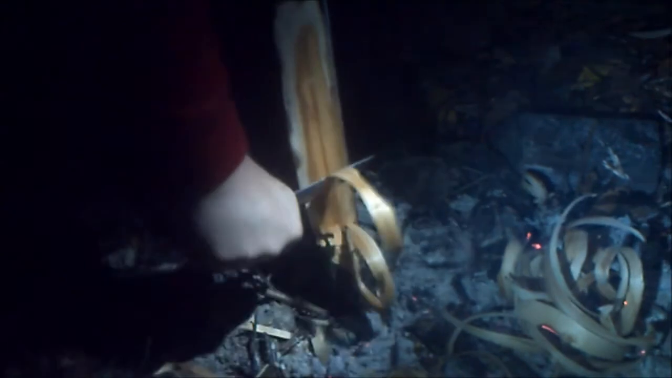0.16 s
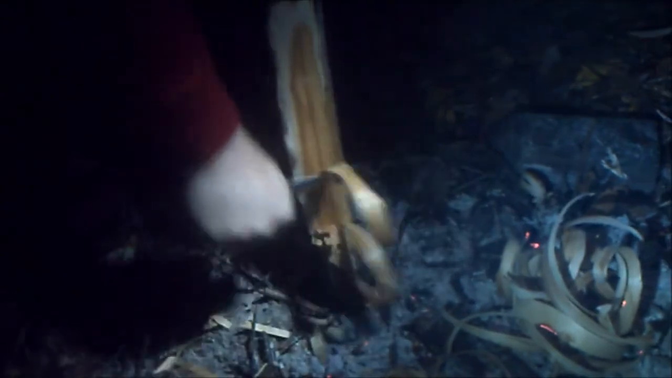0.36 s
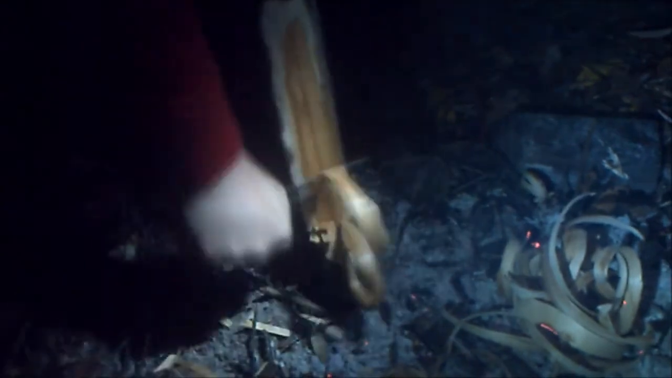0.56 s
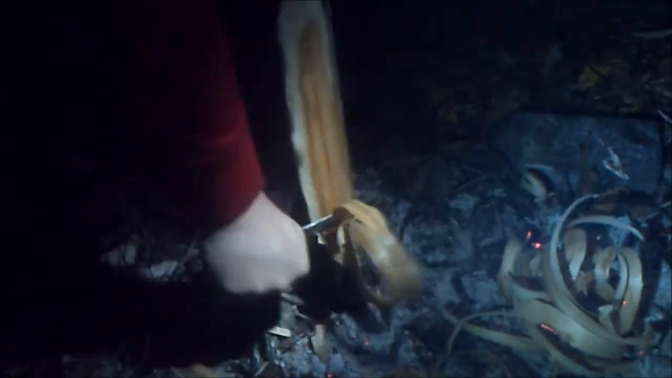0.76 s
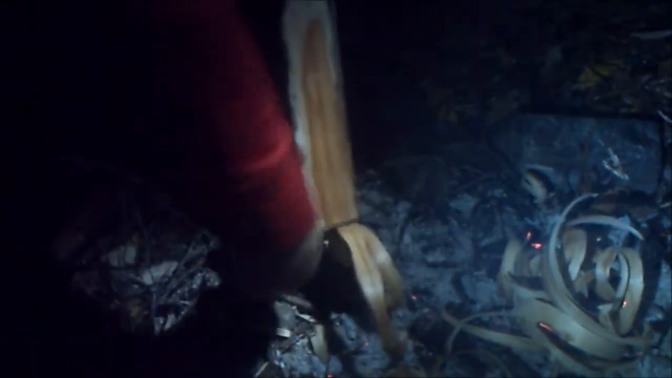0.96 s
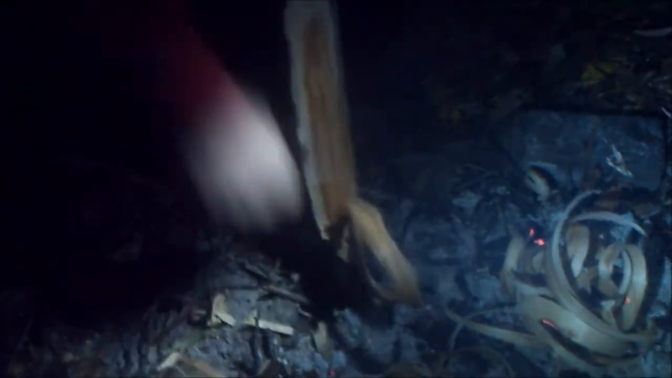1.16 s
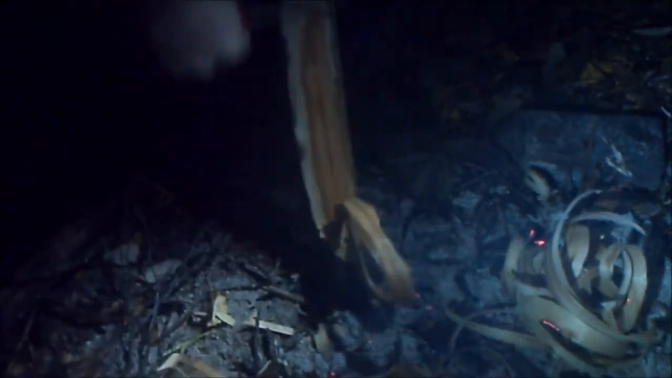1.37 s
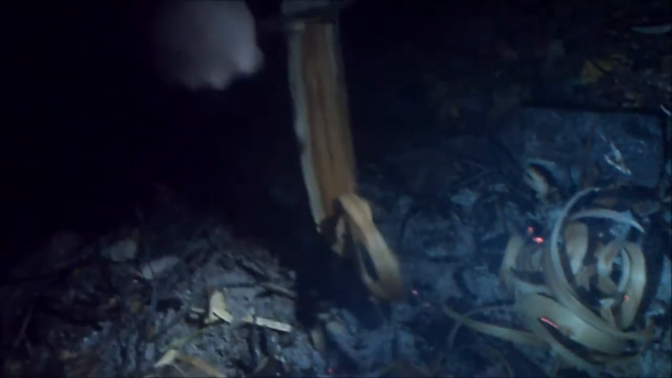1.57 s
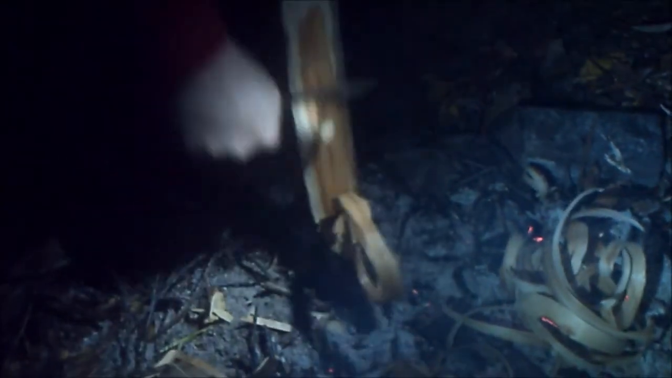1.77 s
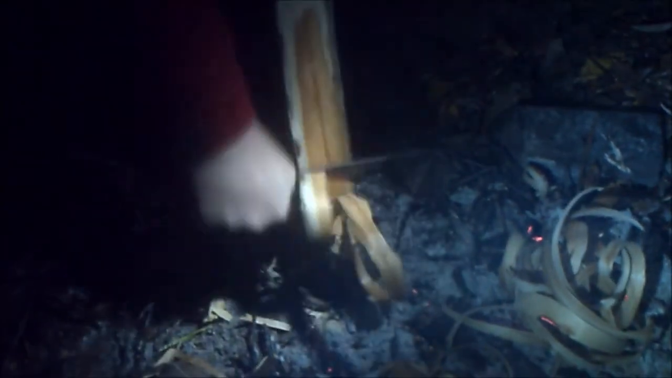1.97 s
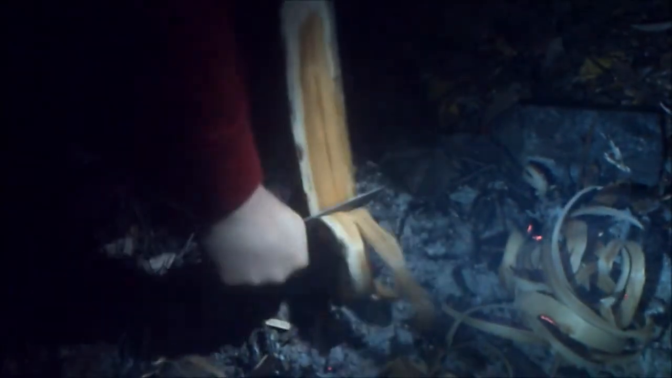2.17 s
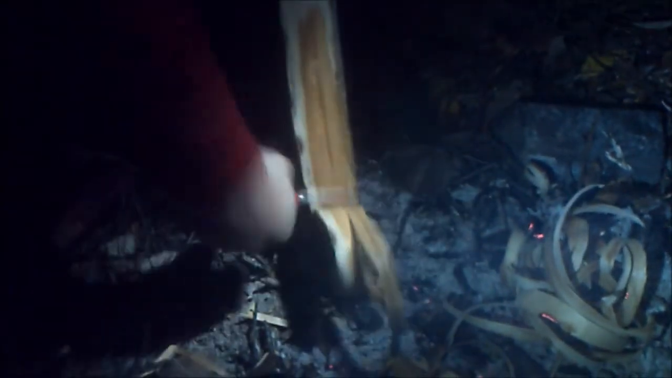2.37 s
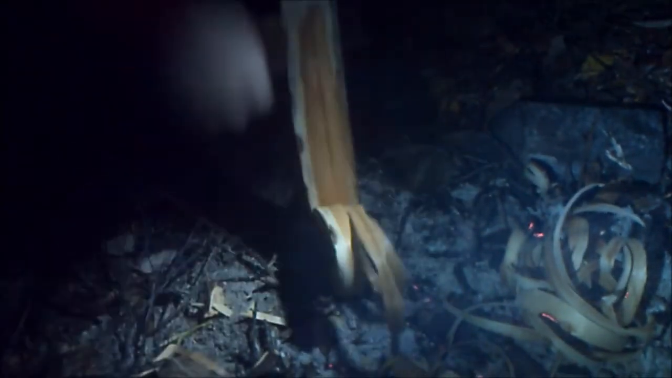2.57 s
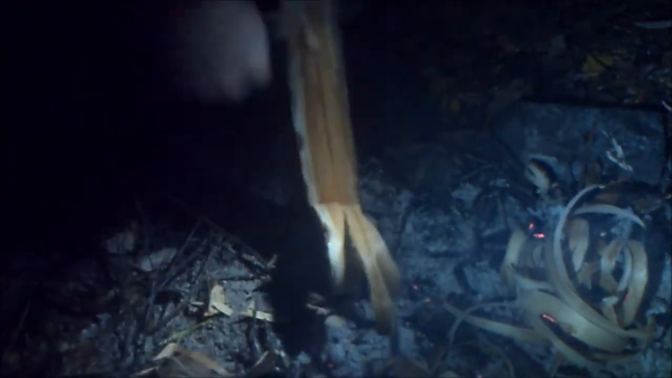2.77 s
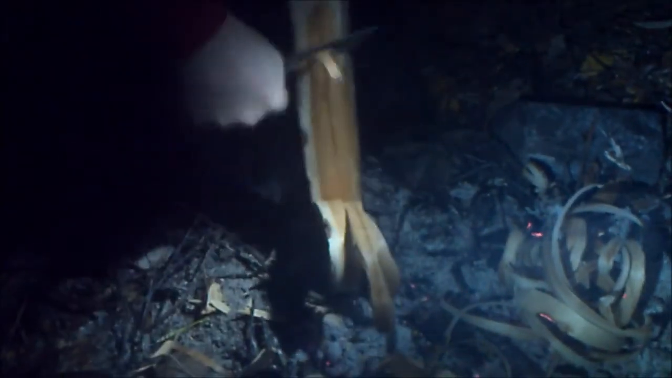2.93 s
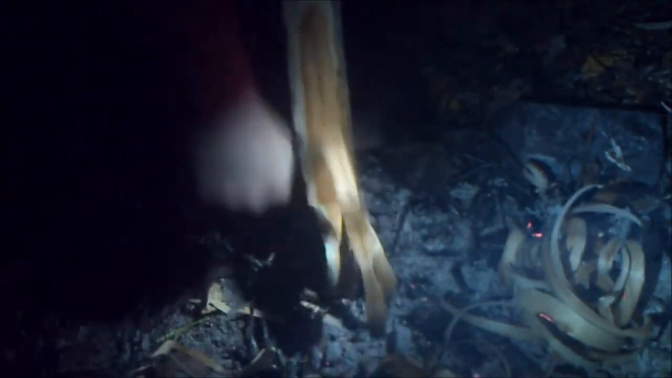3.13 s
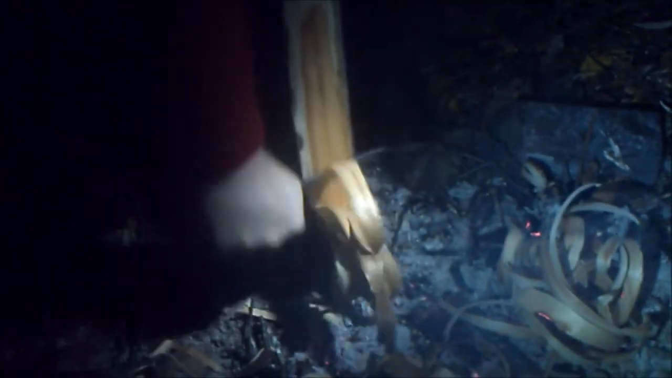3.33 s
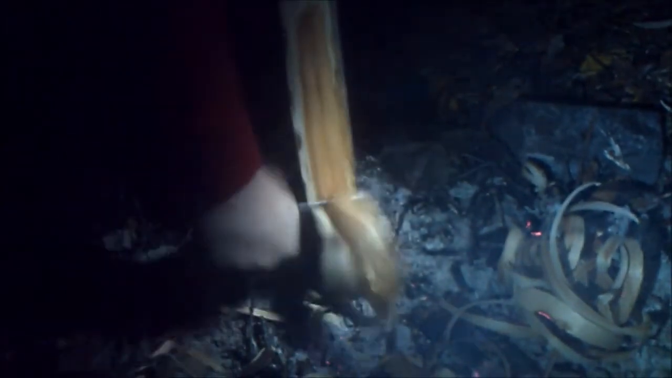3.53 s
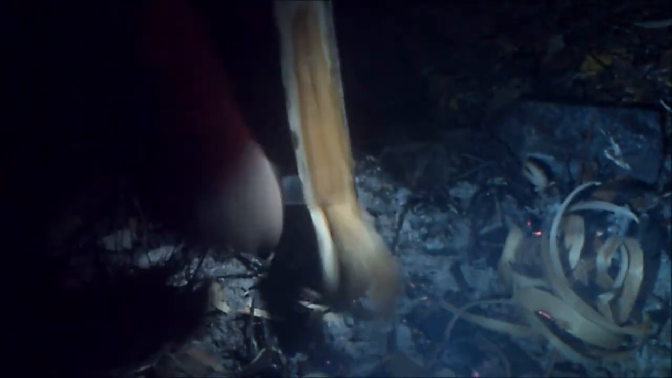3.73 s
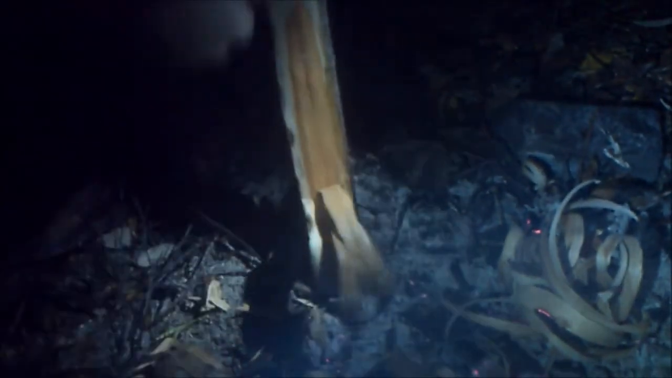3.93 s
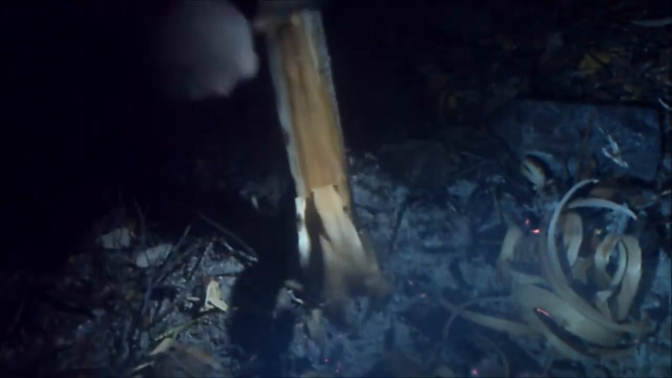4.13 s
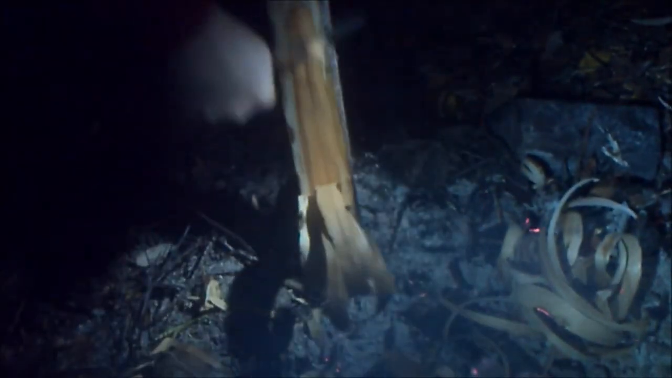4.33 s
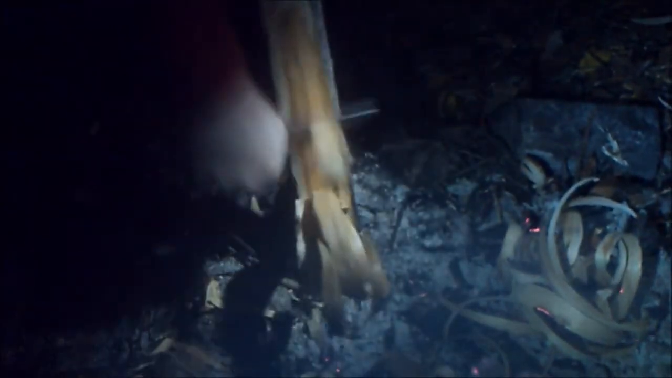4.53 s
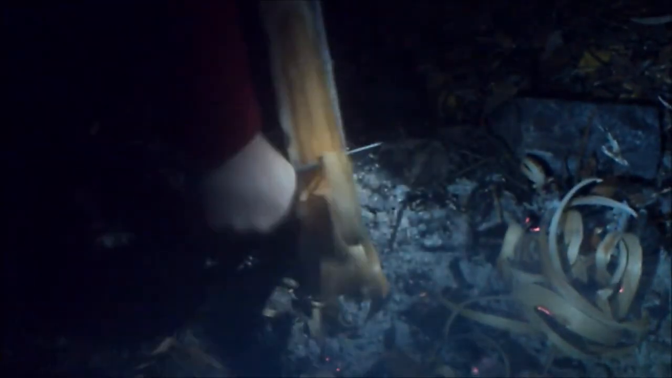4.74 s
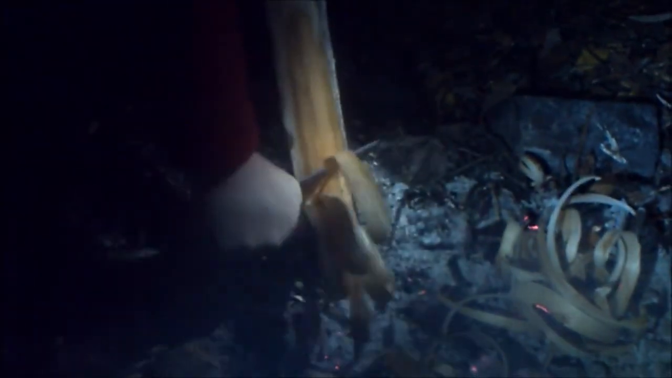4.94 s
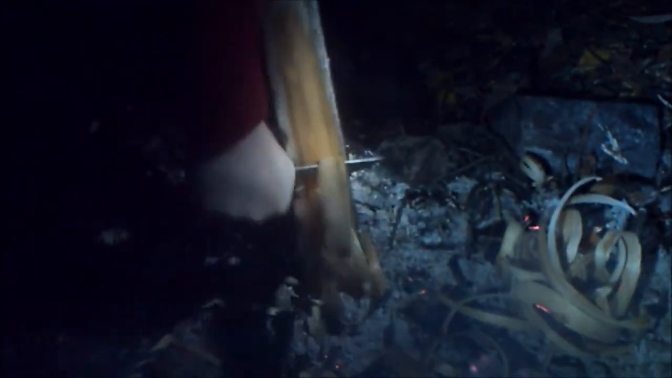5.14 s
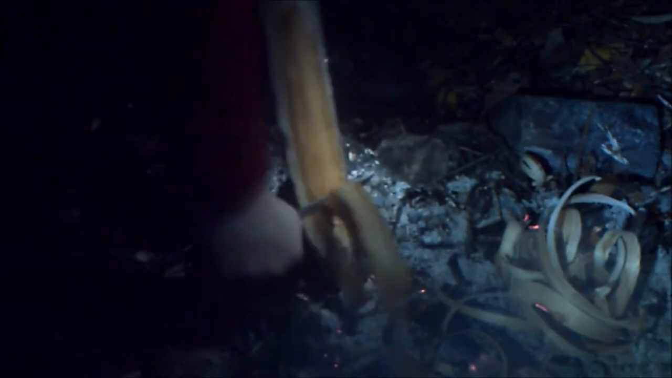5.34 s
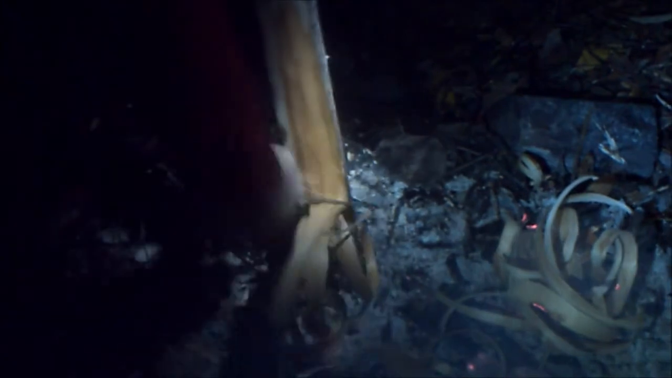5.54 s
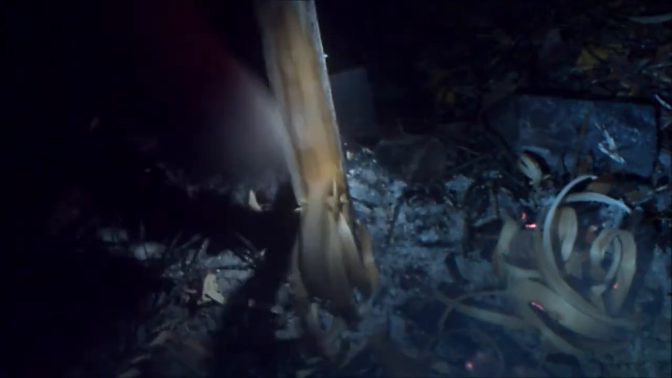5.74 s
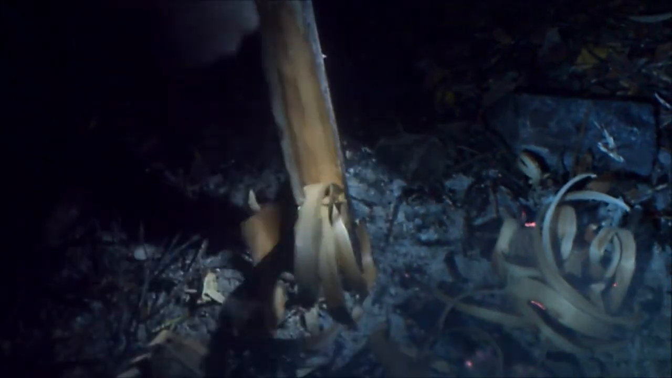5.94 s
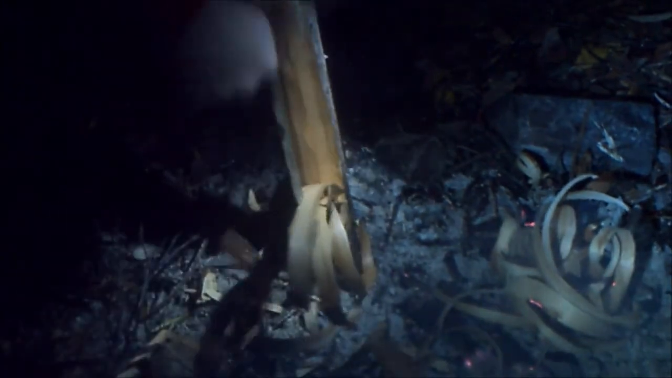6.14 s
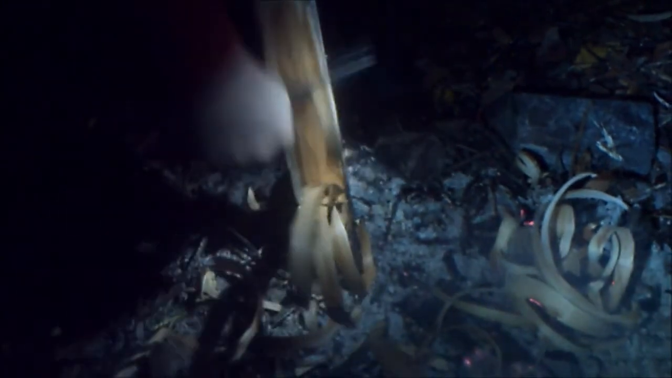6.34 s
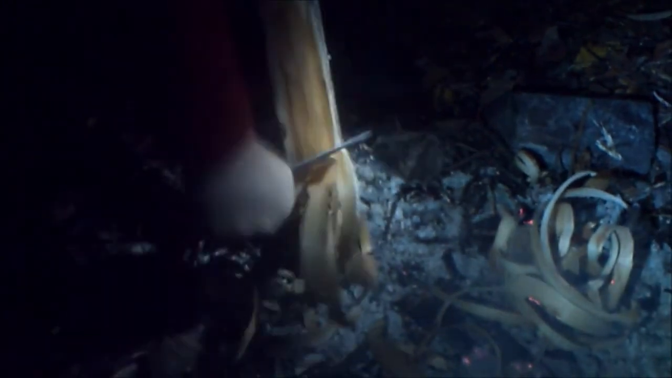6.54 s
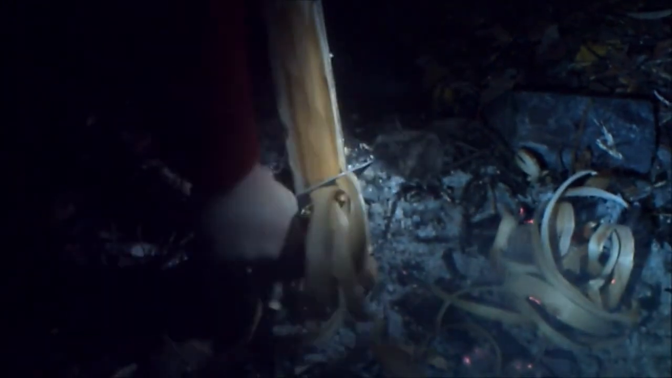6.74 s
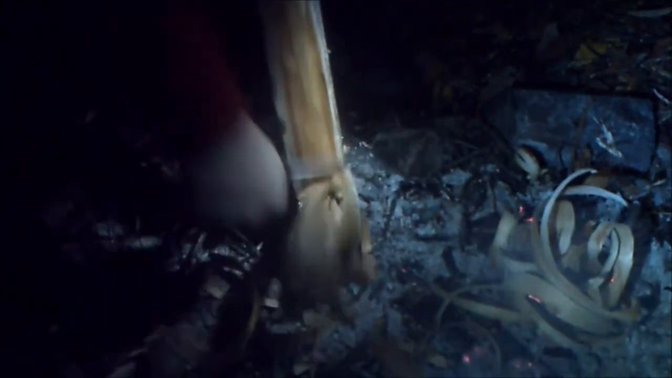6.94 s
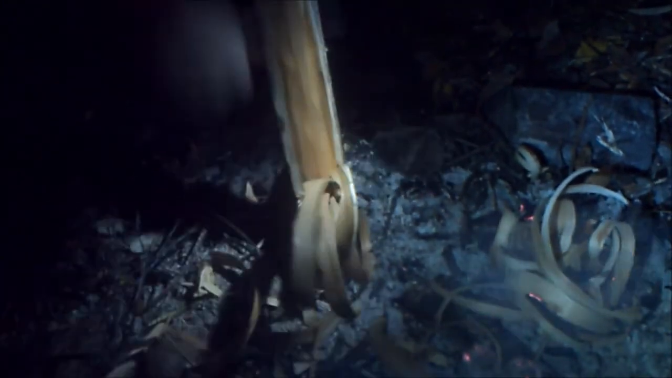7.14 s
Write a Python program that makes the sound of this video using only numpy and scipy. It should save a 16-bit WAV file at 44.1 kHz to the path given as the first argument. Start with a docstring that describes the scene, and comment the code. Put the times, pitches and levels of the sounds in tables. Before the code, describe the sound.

A knife rasps down a dry wooden stick in short ragged strokes, fibres tearing and snapping, with small ticks and hollow knocks between, over soft night air.

```python
"""Whittling a dry stick

A knife shaves long curls down a dry stick that stands on the ground, close to a microphone on a still night.
The edge rasps as a stream of snapping fibres, and catches and tears free in ragged bursts of filtered noise;
each lurch rings the damped modes of the stick. Between strokes the curls brush and tick, lone fibres snap and
the wood gives hollow knocks, as damped sines, and a faint sinking creak. Soft air noise and a thin whine run on.
"""
import sys
import numpy as np
from scipy import signal
from scipy.fft import rfft, irfft
from scipy.io import wavfile
from scipy.ndimage import uniform_filter1d, map_coordinates

SR = 44100
rng = np.random.default_rng(int(sys.argv[2]) if len(sys.argv) > 2 else 0)


def wav_record(signal):
    """Record a signal, one row per channel, as 16-bit PCM in the file named by sys.argv[1]."""
    frames = np.transpose(np.atleast_2d(signal))
    bounded = np.clip(frames, -1, 1)
    # unit amplitude maps onto the largest positive 16-bit level
    quanta = np.round(bounded * 32767).astype(np.int16)
    wavfile.write(sys.argv[1], SR, quanta)


N = 321919
TIME = np.arange(N) / SR
HZ = np.fft.rfftfreq(N, 1 / SR)

# Levels, woodiness and brightness in the tables are relative: the functions trim and scale them.
# spectrum of the background air: [freq_hz, density_db]
AIR_SPECTRUM = [(12, -15), (20, -0.5), (65, 1.5), (93, -2), (129, -2.5), (174, -2.5), (309, -4),
                (478, -7.5), (519, -5.5), (1030, -12), (2220, -16), (7390, -22.5), (8700, -21.5),
                (13900, -24)]
# whine of the microphone's electronics: [freq_hz, width_hz, level_db]
WHINE_BANDS = [(8680, 140, -60), (11200, 100, -68)]
# blade and curls brushing lightly over the wood, and early on a sleeve rustling faintly: [middle_s, length_s,
# level_db, bright_db]
BRUSH_STROKES = [(0.213, 0.053, -51, -22), (0.497, 0.08, -52.5, -16), (0.903, 0.043, -42, 13),
                 (1.06, 0.018, -42.5, 17), (1.202, 0.035, -47.5, -9), (1.583, 0.11, -43, -12),
                 (1.96, 0.064, -38, 13), (2.262, 0.03, -38.5, 9), (2.764, 0.12, -45.5, -7),
                 (3.18, 0.047, -35, 9), (3.33, 0.12, -37, 9), (3.586, 0.074, -35, 6),
                 (3.694, 0.045, -38, 12), (4.09, 0.077, -47, -13), (4.749, 0.032, -33, -4),
                 (5.013, 0.046, -41.5, -6), (5.186, 0.05, -43.5, -7), (5.315, 0.12, -44.5, -5),
                 (5.478, 0.039, -33, 7), (5.632, 0.02, -40.5, 5), (6.058, 0.1, -38, -3),
                 (6.226, 0.05, -38, -2)]
# pushes of the blade through the wood; drag is the rumble of the stick relative to the rasp:
# [start_s, length_s, rasp_db, swell_db, drag_db, bright_db, catch_db (relative to rasp), catches_per_s]
BLADE_PUSHES = [(0.55, 0.076, -38, 0, -5, -1, 8, 49), (1.571, 0.18, -34, 2, 0.5, 12, -4, 81),
                (1.767, 0.1, -27.5, 0.5, -6.5, 7, 8, 87), (1.8824, 0.037, -29, 1, -11.5, -2.5, 10.5, 75),
                (1.974, 0.07, -30, 7, -11, -4, 9, 87), (2.853, 0.04, -35.5, -0.5, -2.5, 1, 2, 99),
                (2.972, 0.14, -30, -5.5, -9.5, 12.5, 1, 71), (3.095, 0.08, -26, -6.5, -13, 7, 4.5, 142),
                (3.335, 0.032, -32, -4, -7, -6, 7, 80), (4.222, 0.033, -35.5, 9, -10, 9, 4, 54),
                (4.2955, 0.11, -38, -8, -3, 2, 8, 56), (4.374, 0.042, -32, -4, -10.5, 5, 11, 88),
                (4.44, 0.064, -32.5, -3.5, -9, -1.5, 16, 110), (4.584, 0.044, -26, 1.5, -7, 1.5, 7, 60),
                (6.134, 0.068, -37, -2, -5, -2, 17.5, 62), (6.255, 0.053, -27.5, 1.5, -5, -0.5, 9, 52),
                (6.388, 0.062, -36, -0.5, -3, -4, 17, 61), (6.513, 0.02, -42.5, 4, -4, 0, 21, 67),
                (6.573, 0.053, -43.5, 0, -8, 3, 6, 63)]
# spectrum of the rasp: [freq_hz, density_db]
RASP_SPECTRUM = [(240, -45), (400, -46), (554, -11.5), (735, -3), (891, -31), (1220, -10), (1520, -4.5),
                 (2110, -1.5), (2550, 2.5), (3390, 4), (3930, -5), (6700, -1), (8250, -1), (10800, -3.5),
                 (13900, -10.5)]
# fixed peaks and hollows in the colour of the scraping and tearing, from blade and microphone:
# [freq_hz, width_hz, lift_db]
CUT_COLOUR = [(1230, 58, -15), (1700, 190, 2), (2500, 610, -5), (4280, 140, 4.5), (5500, 230, 2),
              (6630, 90, 4.5), (8230, 230, 9), (8250, 440, -10), (9320, 500, 2.5), (10720, 250, 5),
              (13000, 330, -11), (14600, 350, -27)]
# the flat of the blade, singing faintly while it slides: [freq_hz, width_hz, lift_db]
SLIDE_RESONANCES = [(2100, 87, 5.5), (3544, 140, 2.5)]
# damped modes of the held stick: [freq_hz, level_db, t60_s]
STICK_MODES = [(189.6, 5.5, 0.034), (220, 7.5, 0.023), (302, -14.5, 0.053), (540, -8, 0.0088)]
# curls ticking against each other: [start_s, level_db, pitch_hz]
CURL_TICKS = [(.225, -36, 2230), (.4115, -33, 2900), (.723, -34, 2080), (.7375, -28, 2220),
              (.765, -37, 2100), (.7915, -30, 2140), (2.243, -29, 2080), (2.2555, -21, 1920),
              (4.732, -37, 2110), (5.09, -32.5, 2480), (6.358, -31.5, 2190), (6.795, -30, 2090),
              (7.084, -36.5, 2530)]
# modes of a tick: [multiple_of_pitch, level_db, swell_s]
CURL_TICK_MODES = [(1, 0.1, 0.00065), (1.4, -1.5, 0.00076)]
# bundles of fibres tearing free as the blade lurches:
# [middle_s, level_db, length_s, woody_db, bright_db, thump_db]
FIBRE_TEARS = [(0.557, -3.5, 0.0035, -7, -2.5, -26.5), (0.565, -11.5, 0.0013, -2, 4, -32.5),
               (0.593, -13.5, 0.0051, 5.5, -12, -43), (0.6, -13.5, 0.0056, 0, -5, -42),
               (0.6045, -21, 0.006, 20, -5, -22), (1.792, -20, 0.013, -18, 0, -31),
               (1.9788, -6.5, 0.0036, 10, 14, -26.5), (1.9861, -16.5, 0.0055, 2, -16, -29),
               (2.0305, -8.5, 0.0052, 9, 5.5, -26), (2.0407, -13, 0.0053, 1, -6, -28),
               (2.8768, -17, 0.0026, 0, 4.5, -35.5), (2.982, -16.5, 0.012, -16, 11, -33),
               (3.0077, -15.5, 0.0046, 11, 13, -26.5), (3.146, -8.5, 0.0016, 1, 10, -51),
               (3.3455, -8, 0.007, -12, -12, -32.5), (3.353, -8.5, 0.0044, 6.5, -2.5, -22.5),
               (4.4134, -8, 0.0014, -2, 0, -32), (4.639, -11, 0.00272, -7, -13.5, -24.5),
               (5.2216, -9, 0.0027, 7, 7, -51), (5.227, -7, 0.0031, 3, -11, -31),
               (5.2322, -1.5, 0.0045, 14, -1, -27.5), (6.396, -14, 0.01, 19.5, 5.5, -32),
               (6.438, -25, 0.008, 22, -14, -21.5), (6.518, -18.5, 0.0092, 22, 8.5, -22.5),
               (6.5855, -10, 0.0093, 22, 12.5, -19), (6.6162, -19, 0.0033, 10, 8, -53),
               (6.6245, -10, 0.0021, 12.5, 5.5, -25.5)]
# spectrum of a tear: [freq_hz, density_db]
TEAR_SPECTRUM = [(80, -66), (220, -12.5), (450, -21), (700, -13), (1200, -21), (1700, -11.5), (2500, -8.5),
                 (3300, -5.5), (4200, -7.5), (6200, 1.5), (8000, 1.5), (10300, 0.5), (12500, -6),
                 (14000, -8)]
# single dry fibres snapping in the curls: [middle_s, level_db]
FIBRE_SNAPS = [(0.872, -20.5), (2.155, -30.5), (2.895, -18.5), (3.296, -23), (3.404, -25), (3.5856, -7),
               (3.726, -20), (4.8226, -17.5), (5.02, -25), (5.3868, -17), (5.6094, -28.5), (6.1071, -17)]
# hollow knocks of wood: [start_s, level_db, pitch_hz]
WOOD_KNOCKS = [(1.178, -33, 597), (2.5305, -26.5, 653), (2.610, -38, 920), (3.353, -25, 720),
               (3.8455, -27, 736), (5.231, -20, 556), (5.6825, -34.5, 815), (5.696, -34, 846),
               (6.794, -41, 1030), (7.076, -32.5, 650)]
# modes of a knock: [multiple_of_pitch, level_db, swell_s]
WOOD_KNOCK_MODES = [(1, 4.5, 0.0017), (2.4, -6.5, 0.00072), (2.85, -5.5, 0.00046), (4.2, -7.5, 0.0013),
                    (5.5, -8, 0.00057)]

AIR_DB = -46.5
HANDLING_DB = -54  # the curls never lie quite still; before the rasp trim
PUSH_ATTACK_S, PUSH_RELEASE_S = 0.0048, 0.017  # time constants
CATCH_S, SNAP_S = 0.003294, 0.0011  # lengths of the bursts
CATCH_JITTER, CATCH_SPREAD_DB = 0.2, 1.5  # unevenness of spacing and of strength
CREAK_START_S, CREAK_DB = 6.797, -38.5
CREAK_FIRST_HZ, CREAK_LAST_HZ = 560, 482
EDGE_HZ = 14100  # upper band limit


def gain_of(db):
    """Decibel law: 20 dB is a tenfold amplitude."""
    return 10 ** (np.asarray(db) / 20)


def unit_rms(x):
    """Normalisation of power: scales x to rms 1."""
    return x / np.sqrt(np.mean(x ** 2) + 1e-20)


def spectrum_db(points, hz):
    """Spectral envelope: a dB curve joined by straight lines over log frequency."""
    freq_hz, level_db = np.transpose(points)
    return np.interp(np.log(hz + 1), np.log(freq_hz + 1), level_db)


def peaks_and_hollows_db(bells, hz):
    """Spectral colouring: the dB that a set of bell-shaped peaks and hollows adds to a sound."""
    return sum(db / (1 + (2 * (hz - f) / width) ** 2) for f, width, db in bells)


def coloured(x, db):
    """Linear filtering: weights the frequency bins of x by a dB curve; rms 1."""
    return unit_rms(irfft(rfft(x) * gain_of(db), len(x)))


def wobble(rate_hz):
    """Random modulation: noise low-passed at rate_hz; rms 1."""
    return unit_rms(irfft(rfft(rng.standard_normal(N)) / (1 + (HZ / rate_hz) ** 4), N))


def add(mix, start_s, sound):
    """Superposition: adds a sound to the mix at its start, cut off at the end."""
    part = mix[max(round(start_s * SR), 0):][:len(sound)]
    part += sound[:len(part)]


def background(drift_db=2.0):
    """Stationary noise: still night air, drifting in level, with the hiss and thin whine of the microphone."""
    noise = coloured(rng.standard_normal(N), spectrum_db(AIR_SPECTRUM, HZ))
    air = noise * gain_of(AIR_DB + drift_db * wobble(22))
    whine = np.zeros(N)
    for freq_hz, width_hz, db in WHINE_BANDS:
        band_db = -10 * np.log10(1 + (2 * (HZ - freq_hz) / width_hz) ** 4)
        whine += gain_of(db) * coloured(rng.standard_normal(N), band_db)
    return air + whine


def stick_ring(swell_s=0.0045, low_hz=130):
    """Modal decay: the stick's answer to one push; it is too thin to radiate deep bass."""
    t = np.arange(SR // 8) / SR
    ring = sum(gain_of(db - 60 * t / t60) * np.sin(2 * np.pi * hz * t) for hz, db, t60 in STICK_MODES)
    no_bass = signal.butter(4, low_hz, "high", fs=SR, output="sos")
    return signal.sosfilt(no_bass, ring * (1 - np.exp(-t / swell_s)))


def fibres(per_s, spread_db):
    """Random impulse train: tiny snaps of either sign, their sizes spread exponentially in dB; rms 1."""
    size = gain_of(spread_db * np.minimum(rng.exponential(1, N), 4))
    sign = rng.choice([-1, 1], N)
    return unit_rms(size * sign * (rng.random(N) < per_s / SR))


def push_force(start_s, length_s, db, swell_db):
    """Contact force: the edge bites, the pressure grows or eases, the edge lets go."""
    before = np.maximum(start_s - TIME, 0) / PUSH_ATTACK_S
    after = np.maximum(TIME - start_s - length_s, 0) / PUSH_RELEASE_S
    progress = np.clip((TIME - start_s) / length_s, 0, 1)
    return gain_of(db + swell_db * (progress - .5)) * np.exp(-before - after)


def contact():
    """Contact force over time: light touch, total force, drag on the stick, and brightness of the rasp."""
    light, bright = np.full(N, gain_of(HANDLING_DB)), np.zeros(N)
    for middle_s, length_s, db, bright_db in BRUSH_STROKES:
        touch = gain_of(db) * .5 ** ((2 * (TIME - middle_s) / length_s) ** 2)
        light += touch
        bright += (bright_db - bright) * touch / light  # the stronger contact sets the brightness
    force, drag = light, light * gain_of(-12)
    for start_s, length_s, db, swell_db, drag_db, bright_db, _, _ in BLADE_PUSHES:
        push = push_force(start_s, length_s, db, swell_db)
        bright += (bright_db - bright) * push / (push + force)
        force = np.maximum(force, push)
        drag = np.maximum(drag, push * gain_of(drag_db))
    return light, force, drag, bright


def scraping(rasp_db=-1, rumble_db=-3.5, chatter_db=2, chatter_hz=220, swing_db=2, crackle=0.25):
    """Stick-slip friction: the edge moves unevenly, snapping fibres and shaking the stick."""
    light, force, drag, bright = contact()
    # a firm push cuts a dense stream of fibres; a light touch also flicks them one by one
    loose = crackle * light / force
    dense = unit_rms(fibres(per_s=7000, spread_db=2.0) + 0.56 * rng.standard_normal(N))
    grains = np.sqrt(1 - loose) * dense + np.sqrt(loose) * fibres(per_s=1500, spread_db=6.5)
    colour_db = spectrum_db(RASP_SPECTRUM, HZ) + peaks_and_hollows_db(CUT_COLOUR + SLIDE_RESONANCES, HZ)
    spectrum = rfft(grains) * gain_of(colour_db)
    # coarse and fine fibres take turns, around the brightness of each push
    fine_share = HZ ** 6 / (HZ ** 6 + 7000. ** 6)
    coarse = irfft(spectrum * (1 - fine_share), N)
    fine = irfft(spectrum * fine_share, N)
    swing = gain_of(swing_db * wobble(30) + 0.3 * bright)
    chatter = unit_rms(gain_of(chatter_db * wobble(chatter_hz)))
    rasp = unit_rms(coarse / swing + fine * swing) * chatter
    shake = unit_rms(signal.oaconvolve(fibres(per_s=360, spread_db=-1.5), stick_ring())[:N])
    return force * gain_of(rasp_db) * rasp + drag * gain_of(rumble_db) * shake


def taps(rows, modes, after_db, after_s, spread, crack_db, crack_s, hardness=0.6, firm_db=-29):
    """Impact: light blows give a few damped cycles, a crack of contact and a faint shiver afterwards."""
    out, t = np.zeros(N), np.arange(SR // 8) / SR
    hz = np.fft.rfftfreq(len(t), 1 / SR)
    for start_s, db, pitch_hz in rows:
        shiver_noise, crack_noise = rng.standard_normal((2, len(t)))
        tilt_db = hardness * min(db - firm_db, 0)  # per octave: a soft blow wakes less of the upper modes
        blow = np.zeros(len(t))
        for multiple, mode_db, swell_s in modes:
            envelope = t / swell_s * np.exp(1 - t / swell_s)
            mode_gain = gain_of(mode_db + tilt_db * np.log2(multiple))
            blow += mode_gain * envelope * np.sin(2 * np.pi * multiple * pitch_hz * t)
        band_db = -10 * np.log10(1 + (np.log((hz + 1) / pitch_hz) / spread) ** 4)
        shiver = gain_of(after_db) * coloured(shiver_noise, band_db) * np.exp(-t / after_s)
        crack = gain_of(crack_db + tilt_db) * crack_noise * np.exp(-t / crack_s)
        add(out, start_s, gain_of(db) * (blow + shiver + crack))
    return out


def ticks():
    """Impact of light bodies: curls tick against each other."""
    return taps(CURL_TICKS, CURL_TICK_MODES, after_db=-5.5, after_s=0.0038, spread=0.47,
                crack_db=-1.0, crack_s=0.00085)


def tearing(rows, thump_trim_db=3, rustle_db=-28, rustle_s=0.002, shape=1.07, skew=0.033, body_hz=3000,
            lag=0.553, ragged_db=3.0, lead=0.93, bite_s=0.00056, detune=0.041, size=4096):
    """Brittle fracture: a bundle gives way in a burst, the curl rustles on, the freed stick springs back."""
    out, ring = np.zeros(N), stick_ring()
    ring /= abs(ring).max()
    steps = np.arange(len(ring))
    t, hz = (np.arange(size) - size // 4) / SR, np.fft.rfftfreq(size, 1 / SR)
    colour_db = spectrum_db(TEAR_SPECTRUM, hz) + peaks_and_hollows_db(CUT_COLOUR, hz)
    woody = 1 / (1 + (hz / body_hz) ** 4)
    octaves = np.log2(np.maximum(hz, 4000) / 8000)
    for middle_s, db, length_s, woody_db, bright_db, thump_db in rows:
        noise, lumps = rng.standard_normal((2, size))
        grip = rng.standard_normal()
        if db < -60:  # too faint to hear
            continue
        burst = .5 ** (np.abs(2 * t / length_s / (1 + skew * np.sign(t))) ** shape)
        bite = .5 + .5 * np.tanh((t + lead * length_s) / bite_s)  # the first fibres break abruptly
        rustle = gain_of(rustle_db) * np.exp(-np.abs(t) / rustle_s) * (t > 0)
        envelope = bite * burst + rustle
        # the fibres of a bundle part one after another, which makes the burst ragged
        ragged = gain_of(ragged_db * unit_rms(uniform_filter1d(lumps, 30)))
        tear_db = colour_db + 0.9 * woody_db * woody + 0.52 * bright_db * octaves
        crackle = coloured(noise * ragged * envelope, tear_db)
        # bending waves are slower at low pitch: the treble is on time and the woody part comes last
        bending = np.exp(-4j * np.pi * lag * length_s * (np.sqrt(1000 * hz) - hz / 6))
        crackle = irfft(rfft(crackle) * bending) * np.sqrt(np.mean(envelope ** 2))
        add(out, middle_s + t[0], gain_of(db) * crackle)
        # the shifting grip detunes the stick a little from one thump to the next
        thump = np.interp(steps * np.exp(detune * grip), steps, ring)
        add(out, middle_s + 0.3 * length_s, gain_of(thump_db + thump_trim_db) * thump)
    return out


def catches(woody_db=7, woody_per_drag=0.71, bright_spread_db=3, thump_db=-8.0, let_go_db_per_s=3000, count=18):
    """Stick-slip: in a push the edge catches repeatedly; more drag makes woodier tears and heavier thumps."""
    rows = []
    for start_s, length_s, db, swell_db, drag_db, bright_db, catch_db, per_s in BLADE_PUSHES:
        gap, strength, tint = rng.standard_normal((count, 3)).T
        gaps_s = np.exp(CATCH_JITTER * gap) / per_s
        after_s = np.cumsum(gaps_s) - gaps_s
        swell = swell_db * (np.minimum(after_s / length_s, 1) - .5)
        let_go_db = let_go_db_per_s * np.maximum(after_s - length_s, 0)
        peaks_db = db + swell - let_go_db + catch_db + CATCH_SPREAD_DB * strength
        for s, peak_db, shade in zip(after_s, peaks_db, tint):
            rows.append((start_s + s, peak_db, CATCH_S, woody_db + woody_per_drag * drag_db,
                         bright_db + bright_spread_db * shade, peak_db + drag_db + thump_db))
    return rows


def snaps(woody_db=3, bright_db=6):
    """Fracture of a lone fibre: one very short tear, too light to move the stick, so without a thump."""
    return [(s, db, SNAP_S, woody_db, bright_db, -np.inf) for s, db in FIBRE_SNAPS]


def knocks():
    """Impact of hollow wood: longer-lasting low modes with a softer crack."""
    return taps(WOOD_KNOCKS, WOOD_KNOCK_MODES, after_db=-2.0, after_s=0.0047, spread=0.34,
                crack_db=-16, crack_s=0.0076)


def creak(rough=0.81, sag_s=0.025, fade_s=0.032):
    """Friction tone: wood rubs on wood after the last push, in a short, unsteady, sinking note."""
    t = np.maximum(TIME - CREAK_START_S, 0)
    pitch_hz = CREAK_LAST_HZ + (CREAK_FIRST_HZ - CREAK_LAST_HZ) * np.exp(-t / sag_s)
    level = gain_of(CREAK_DB) * (t > 0) * np.exp(-t / fade_s) * (1 + rough * wobble(94))
    return np.sqrt(2) * level * np.sin(2 * np.pi * np.cumsum(pitch_hz) / SR)


def off_the_hand(x, share=0.48, delay_s=0.000907, travel=0.232):
    """Comb filtering: the moving fist reflects the treble, and the changing delay sweeps a faint comb."""
    delay = delay_s * np.exp(travel * wobble(4.33))
    treble = irfft(rfft(x) * HZ ** 2 / (HZ ** 2 + 1500 ** 2), N)
    return x + share * map_coordinates(treble, [(TIME - delay) * SR], order=3)


def surroundings(x, wet_db=-24, t60_s=0.24):
    """Scattering: ground and brush send back a short, faint tail of sparse echoes."""
    t = np.arange(SR // 3) / SR
    echoes = rng.standard_normal(len(t)) * (rng.random(len(t)) < .06)
    tail = echoes * (t > .004) * gain_of(-60 * t / t60_s)
    return x + gain_of(wet_db) * signal.oaconvolve(x, tail / np.linalg.norm(tail))[:N]


def scene():
    """Superposition: knife, stick and curls, with their scattered tail, over the quiet background."""
    cut = off_the_hand(scraping() + tearing(FIBRE_TEARS + snaps() + catches()))
    stick_and_curls = cut + ticks() + knocks() + creak()
    return (surroundings(stick_and_curls) + background())[None]


def record(dry):
    """Overload and band limit: peaks beyond full scale are clipped, then a low-pass ends the treble."""
    low_pass = signal.firwin(255, EDGE_HZ, window=("kaiser", 7), fs=SR)
    return signal.oaconvolve(np.clip(dry, -1, 1), low_pass[None], "same")


dry = scene()
out = record(dry)
wav_record(out)
```